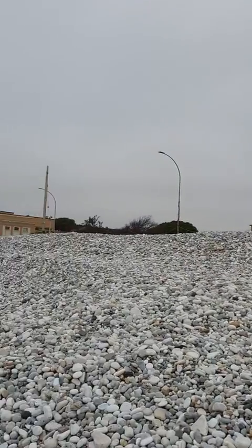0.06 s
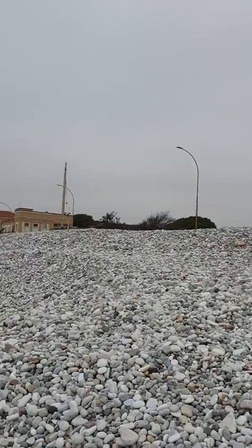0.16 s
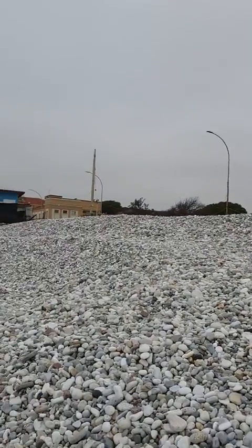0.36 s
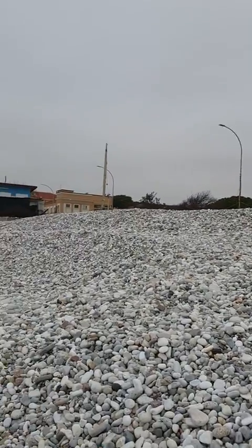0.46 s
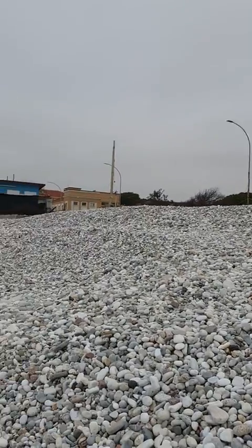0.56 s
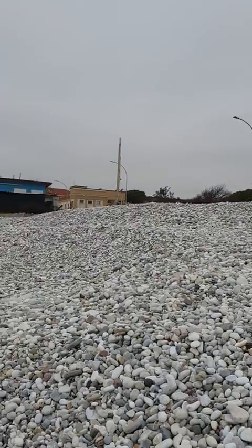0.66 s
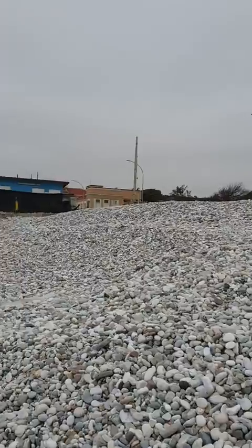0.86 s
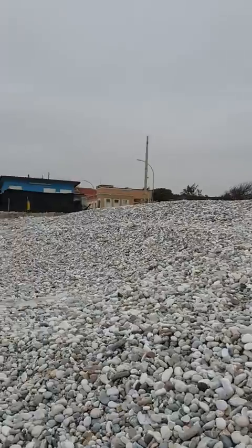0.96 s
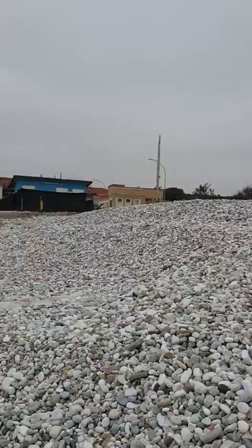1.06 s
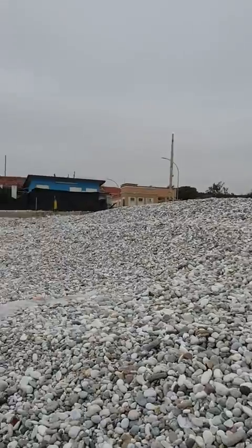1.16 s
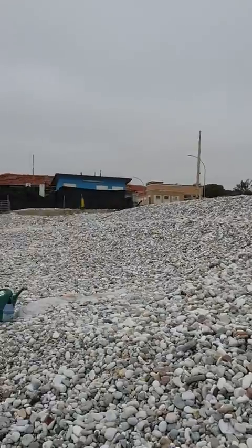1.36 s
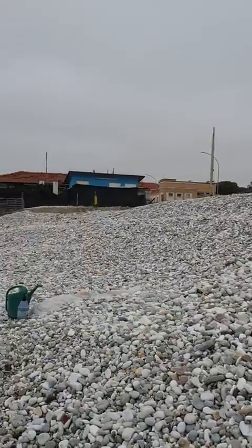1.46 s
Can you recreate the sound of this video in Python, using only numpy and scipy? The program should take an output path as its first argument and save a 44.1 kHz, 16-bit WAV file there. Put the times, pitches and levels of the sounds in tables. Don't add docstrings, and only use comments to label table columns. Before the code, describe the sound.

Footsteps crunch into loose beach pebbles, stones clacking, with light key jingles and faint distant surf.

```python
import sys
import numpy as np
from scipy import signal
from scipy.io import wavfile
from scipy.ndimage import uniform_filter1d

SR = 44100
rng = np.random.default_rng(int(sys.argv[2]) if len(sys.argv) > 2 else 0)


def level_to_linear(level):
    exponent = np.asarray(level, float) / 20
    return 10 ** exponent


def unload_audio(sound):
    columns = np.transpose(np.atleast_2d(sound))
    steps = np.round(np.clip(columns, -1, 1) * 32767)
    wavfile.write(sys.argv[1], SR, steps.astype(np.int16))


N = 66150
LAG_SAMPLES = 7


def evened(x):
    return x / np.sqrt(np.mean(x ** 2) + 1e-20)


def read(points, hz):
    f, value = np.transpose(points)
    return np.interp(np.log(hz + 1), np.log(f + 1), value)


def add(mix, start_s, sound):
    part = mix[..., max(round(start_s * SR), 0):][..., :sound.shape[-1]]
    part += sound[..., :part.shape[-1]]


def ports(x):
    return np.array([np.r_[np.zeros(LAG_SAMPLES), x[:-LAG_SAMPLES]], x])


def fuzzy(hz, width_hz, size):
    z = rng.standard_normal(size) + 1j * rng.standard_normal(size)
    r = np.exp(-np.pi * width_hz / SR)
    slow = signal.lfilter([1], [1, -2 * r, r * r], z)
    carrier = np.exp(2j * np.pi * hz * np.arange(size) / SR)
    return evened((slow * carrier).real)


# t/s, rise/s, hold/s, level/dB
SLIPS = [(0.0556, .001, .005, -45.5), (0.233, 0.0053, 0.0093, -39.5), (0.275, 0.0016, 0.0067, -33),
         (0.325, 0.016, 0.0095, -30.5), (0.347, .002, .003, -39), (.371, .002, 0.0077, -36),
         (0.4, .001, 0.0033, -35), (0.435, 0.0054, 0.038, -34), (.474, .002, .008, -33),
         (0.48, 0.0023, 0.027, -30.5), (0.555, 0.0065, 0.034, -35), (0.67, 0.0013, 0.034, -40.5),
         (0.899, 0.0062, 0.015, -42), (0.913, 0.0028, 0.0067, -32.5), (0.96, 0.0095, 0.013, -27.5),
         (1, 0.013, 0.027, -32.5), (1.06, 0.0035, 0.037, -29.5), (1.11, 0.0017, 0.017, -27.5),
         (1.13, .002, 0.0048, -40), (1.158, 0.00057, .008, -38.5), (1.19, 0.0042, 0.0043, -41)]
# t/s, level/dB, brightness/(dB/octave)
WEIGHT = [(0, -51, 1.5), (.15, -54.5, -0.5), (.21, -55.5, 1), (.232, -80, 8), (0.239, -41, 4.5),
          (.45, -36, 2.5), (.6, -37.5, 1), (.7, -47, -0.5), (0.742, -52.5, -2.5), (.88, -49.5, -3.5),
          (.92, -40.5, 5.5), (.955, -48, 3.5), (1.08, -38, 1.5), (1.14, -40, 3), (1.22, -47.5, -0.5),
          (1.3, -55, 0.5), (1.42, -54, -2), (1.5, -50.5, -1.5)]
# f/Hz, density/dB
STONE_SPECTRUM = [(1150, -7), (2500, -1.5), (3700, -5), (4900, -4), (6500, -6), (10500, -6), (13500, -12),
                  (15800, -15)]
SLIP_FADE_DB_PER_S = 1403
GRAINS_PER_S, GRAIN_SPREAD_DB, LUMPS_DB = 16000, 2.2, 1.2
GRAIN_CYCLES, LAG_SPREAD_SAMPLES = 17., 2.5


def crunch(count=96):
    t = np.arange(N) / SR
    weight_s, weight_db, tilt = np.transpose(WEIGHT)
    power = level_to_linear(np.interp(t, weight_s, weight_db)) ** 2
    bright_db = np.interp(t, weight_s, tilt)
    for start, rise, hold, db in SLIPS:
        u = t - start
        fade_db = SLIP_FADE_DB_PER_S * np.clip(u - rise - hold, 0, .2)
        power = power + (np.clip(u / rise, 0, 1) * level_to_linear(db - fade_db)) ** 2

    size = level_to_linear(GRAIN_SPREAD_DB * np.minimum(rng.exponential(1, N), 4))
    size = size * (rng.random(N) < GRAINS_PER_S / SR)
    lumps = evened(uniform_filter1d(rng.standard_normal(N), size=90))
    size = evened(size * level_to_linear(LUMPS_DB * lumps))
    size = size * rng.choice([-1., 1.], N) * np.sqrt(power)

    stone = rng.integers(0, count, N)
    out, u = np.zeros((2, N)), np.arange(1500) / SR
    pitches = np.geomspace(700, 15800, count)
    total = np.mean(level_to_linear(read(STONE_SPECTRUM, pitches)) ** 2 * pitches)
    for k, hz in enumerate(pitches):
        ring = np.exp(rng.uniform(-2.6, 1.0))
        lag = rng.standard_normal() * LAG_SPREAD_SAMPLES * np.sqrt(8000 / hz)
        late = np.maximum(u - np.array([[LAG_SAMPLES + 10 + lag], [10]]) / SR, 0)
        decay = np.exp(-late * hz / (GRAIN_CYCLES * ring))
        grain = np.sin(2 * np.pi * hz * late) * decay * (1 - np.exp(-late * hz / 0.12))
        grain = grain / np.linalg.norm(grain[1])
        grain = grain * level_to_linear(read(STONE_SPECTRUM, hz)) * np.sqrt(hz / total)
        hits = size * (stone == k) * level_to_linear(bright_db * np.log2(hz / 5000))
        out += signal.oaconvolve(hits[None], grain, axes=1)[:, :N]
    return out


# t/s, peak/dB, f/Hz
CLACKS = [(0.0606, -28, 4040), (0.0636, -28, 11500), (.069, -37, 3170), (0.109, -39, 11500),
          (0.104, -32, 4600), (0.117, -36.5, 5640), (0.146, -71, 3580), (.161, -34.5, 11500),
          (.179, -40, 10900), (.345, -28, 3420), (.355, -32, 7000), (.405, -27, 4480), (0.4083, -19, 4770),
          (.4085, -29.5, 5000), (.62, -33, 5000), (0.705, -34, 2520), (0.729, -32.5, 2880),
          (1.267, -44, 7000), (1.481, -39.5, 3900), (0.641, -33.5, 2430), (1.039, -26, 4200),
          (1.0712, -16.5, 2480), (1.114, -38, 3500), (1.126, -25, 4580), (1.187, -29, 3000),
          (1.19, -33, 2500), (1.363, -36.5, 2460), (0.4839, -12, 4260), (0.5361, -16, 2720),
          (.654, -24, 8000), (0.687, -26, 4060), (0.785, -36, 3100), (0.851, -36, 4460),
          (0.8541, -21, 2240), (1.199, -26.5, 3170), (1.281, -32, 3140), (1.312, -37.5, 4000),
          (1.234, -36, 8300), (1.336, -62.5, 10000), (1.345, -34, 1950), (1.381, -34.5, 4400),
          (1.406, -38, 4900), (1.455, -36.5, 3760)]
CLACK_CYCLES, SNAP_PER_CYCLE = 1.3, 14.


def clacks():
    out, u = np.zeros(N), np.arange(600) / SR
    for s, db, hz in CLACKS:
        ring = np.cos(2 * np.pi * hz * u) * np.exp(-u * np.sqrt(4000 * hz) / CLACK_CYCLES)
        add(out, s, level_to_linear(db) * 2.26 * ring * (1 - np.exp(-u * hz * SNAP_PER_CYCLE)))
    return ports(out)


# t/s, length/s, level/dB, f/Hz
THUDS = [(0.044, 0.04, -49, 66), (0.261, 0.048, -55, 280.7), (0.339, 0.026, -56, 349),
         (0.431, 0.038, -59.5, 347), (0.486, 0.01, -44, 335), (0.594, 0.067, -43, 314),
         (0.683, 0.035, -46, 204), (.808, 0.0077, -43, 791), (0.855, 0.003, -43.5, 454),
         (1.069, 0.035, -43.5, 1161), (1.366, .006, -51.5, 505), (1.05, 0.025, -46.5, 396),
         (1.43, 0.069, -52, 295.2)]
THUD_FADE_DB_PER_S = 600


def thuds():
    out, u = np.zeros(N), np.arange(6000) / SR
    for s, length, db, hz in THUDS:
        level = level_to_linear(db - THUD_FADE_DB_PER_S * np.maximum(u - length, 0))
        attack = np.minimum(u / 0.00047, 1)
        add(out, s, level * attack * fuzzy(hz, 1.36 * hz, len(u)))
    return ports(out) + 0.18 * ground(ports(out))


# f/Hz, level/dB, t60/s
KEY_LONG = [(1652, -6.5, .24), (4344, -2, .75), (5300, -13, .4), (11800, -12, .4), (5000, -17, .38),
            (6778, -14, .36), (8400, -10, .5), (8867, -9, .58), (9060, -11, .4), (10175, -3, .63),
            (9830, -9, .46)]
KEY_RING = [(2430, -8, .19), (5287, 1, .3), (5600, -4, .12), (6126, -5, .12), (9640, -1, .25),
            (9722, -3, .36), (10148, -2, .72), (8995, -8, .4), (11610, -2, .08), (11760, 1, .34),
            (14720, -10, .3), (15600, -9, .2)]
KEY_FLAT = [(2406, -10, .09), (4732, -9, .08), (8105, 4, .12), (7671, -8, .2), (8860, 3, .15),
            (8965, -1, .15), (9050, -3, .2), (9845, -3, .08), (10710, 1, .05), (11450, -7, .12),
            (13500, -12, .1)]
KEY_SMALL = [(2200, -8, .12), (4786, 2, .05), (5507, -8, .1), (8156, -2, .15), (8893, 4, .065),
             (9868, 4, .09), (10310, -1, .11), (11630, -5, .2), (12610, -5, .067), (15430, -5, .09)]
KEY_FOB = [(2435, 3, .14), (4301, -6, .5), (5297, -2, .65), (6467, -1, .5), (7424, -2, .4), (8110, -2, .4),
           (9800, -4, .35), (12190, -1, .12)]
KEY_CAP = [(1707, -5, .17), (2683, -1, .3), (4300, -2, .3), (4727, 0, .13), (5190, -3, .4), (7503, -3, .2),
           (8430, 2, .03), (8945, 0, .36), (11400, -8, .3), (12400, -6, .5), (13140, -5, .1),
           (15320, -7, .06)]
# t/s, level/dB, free ringing/s
KNOCKS_LONG = [(0.0002, -42, 0.25)]
KNOCKS_RING = [(0.2362, -37.5, 0.059)]
KNOCKS_TIP = [(0.274, -35.5, 0.11), (0.896, -51, 0.024), (0.914, -38, 0.0061), (1.019, -40.5, 0.051),
              (1.159, -44.5, .012), (1.118, -43, 0.015), (1.2, -60, 0.03)]
KNOCKS_FLAT = [(.334, -36.5, 0.011), (.345, -36.5, 0.014), (.372, -43.5, .025), (.444, -30.5, 0.011),
               (.454, -30, 0.083), (1.02, -36.5, 0.063)]
KNOCKS_SMALL = [(.4045, -40, 0.0088), (.4865, -28, 0.021), (.516, -38, 0.027), (1.1135, -36.5, 0.028)]
KNOCKS_FOB = [(.535, -39, .065)]
KNOCKS_CAP = [(1.069, -35.5, 0.031), (.97, -42, 0.012)]
DAMPED_T60_S = 0.049
SWAY_DB, TURN_RAD, RATTLE = 1.5, 1., .85


def keys():
    out, u = np.zeros((2, N)), np.arange(14000) / SR
    for modes, knocks in [(KEY_LONG, KNOCKS_LONG), (KEY_RING, KNOCKS_RING), (KEY_RING[4:], KNOCKS_TIP),
                          (KEY_FLAT, KNOCKS_FLAT), (KEY_SMALL, KNOCKS_SMALL), (KEY_FOB, KNOCKS_FOB),
                          (KEY_CAP, KNOCKS_CAP)]:
        hz, db, t60 = np.transpose(modes)[:, :, None]
        for s, knock_db, free in knocks:
            phase, turn, sway = rng.standard_normal((3, len(modes), 1))
            free_db = -60 * u / np.clip(t60, .02, 1.5)
            damped_db = -60 * np.maximum(u - free, 0) / DAMPED_T60_S
            level = level_to_linear(knock_db + db + SWAY_DB * sway + free_db + damped_db)
            touch = rng.standard_normal((len(modes), len(u)))
            touch = evened(uniform_filter1d(touch, size=200, axis=1))
            level = level * (1 + RATTLE * np.exp(-10 * free) * touch)
            angle = 2 * np.pi * hz * (1 + sway / 500) * u + 10 * phase
            both = np.array([np.sin(angle + TURN_RAD * turn), np.sin(angle)])
            add(out, s, (level * both).sum(1) * np.minimum(u / 0.00033, 1))
    return out


GROUND_T60_S, GROUND_DB, SHIFTS_PER_S = .025, -10, 9


def ground(x):
    u, out = np.arange(2000) / SR, 0
    turn = 2 * np.pi * SHIFTS_PER_S * np.arange(N) / SR / 3
    for k in range(3):
        tail = rng.standard_normal((2, len(u))) * level_to_linear(-60 * u / GROUND_T60_S)
        tail = tail * (rng.random((2, len(u))) < .1)
        share = np.sqrt(2 / 3) * np.cos(turn / 2 + k * np.pi / 3)
        out = out + signal.oaconvolve(x * share, tail / np.linalg.norm(tail[0]), axes=1)[:, :N]
    return out


# f/Hz, density/dB
SURF_SPECTRUM = [(53, -56), (90, -7), (130, -3.5), (821, -15), (3660, -27), (10100, -40.5), (16000, -26)]
# f/Hz, correlation/1
SURF_SAME = [(50, 1), (400, 0.41), (2000, 0.08), (8000, 0.54)]
# f/Hz, width/Hz, level/dB
ROLL = [(49.6, 13.7, -58.5), (81.5, 15, -59)]
SURF_DB, PATCHY_DB, ROLL_APART = -54, 2.2, .55


def surf():
    frames, hz = N // 256 + 5, np.fft.rfftfreq(1024, 1 / SR)
    a, b, c, d, patches = rng.standard_normal((frames, 513, 5)).T
    patches = uniform_filter1d(patches, size=12, axis=0)
    patches = evened(uniform_filter1d(patches, size=12, axis=1))
    same = np.clip(read(SURF_SAME, hz), -1, 1)[:, None]
    left = a + 1j * b
    right = same * left + np.sqrt(1 - same ** 2) * (c + 1j * d)
    right = right * np.exp(2j * np.pi * hz * LAG_SAMPLES / SR)[:, None]
    level = level_to_linear(read(SURF_SPECTRUM, hz)[:, None] + PATCHY_DB * patches)
    z = np.array([left, right]) * level * (hz[:, None] > 40)
    wash = signal.istft(z, nperseg=1024, noverlap=768)[1][:, :N]
    roll = [sum(level_to_linear(db) * fuzzy(f, w, N) for f, w, db in ROLL) for _ in range(3)]
    return level_to_linear(SURF_DB) * evened(wash) + roll[0] * [[1], [1.4]] + ROLL_APART * np.array(roll[1:])


def thin(x, cut_hz=900):
    return signal.lfilter(*signal.butter(2, cut_hz, "high", fs=SR), x)


def scene():
    near = thin(crunch() + clacks()) + keys()
    return near + level_to_linear(GROUND_DB) * ground(near) + thuds() + surf()


def low_pass(x):
    return signal.sosfilt(signal.butter(12, 17000, fs=SR, output="sos"), x)


# f/Hz, width/Hz, level/dB
SHADOW = [(800, 500, -5), (2950, 1000, -18), (7200, 3000, -11), (14500, 5000, -7)]
RIGHT_DB, EDGE_HZ = -3.5, 16100


def record(dry):
    right = dry[1] * level_to_linear(RIGHT_DB)
    for hz, width, db in SHADOW:
        w = 2 * np.pi * hz / SR
        a = np.sin(w) * width / hz / 2
        dip = [1 + a * level_to_linear(db), -2 * np.cos(w), 1 - a * level_to_linear(db)]
        right = signal.lfilter(dip, [1 + a, -2 * np.cos(w), 1 - a], right)
    edge = signal.firwin(511, EDGE_HZ, window=("kaiser", 9), fs=SR)
    both = signal.oaconvolve([dry[0], right], edge[None], "same")
    return low_pass(both)


dry = scene()
out = record(dry)
unload_audio(out)
```